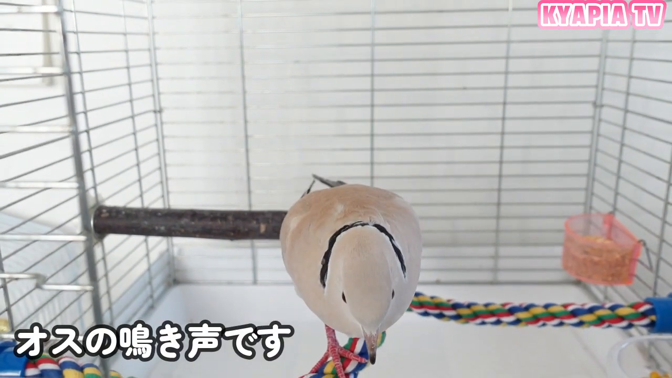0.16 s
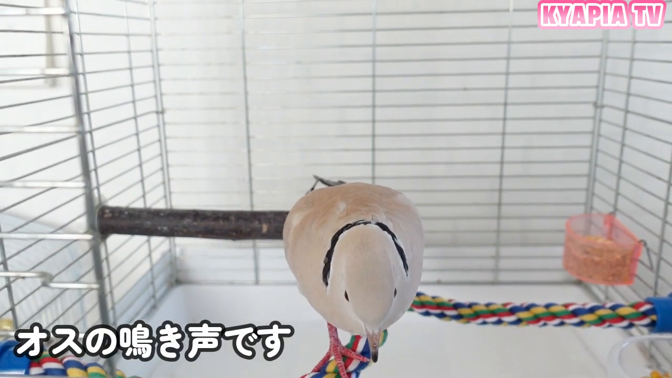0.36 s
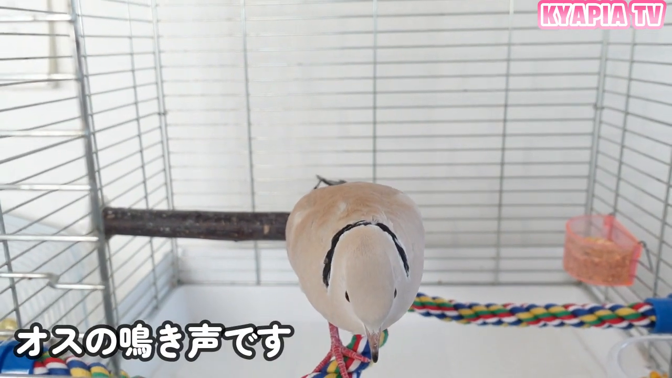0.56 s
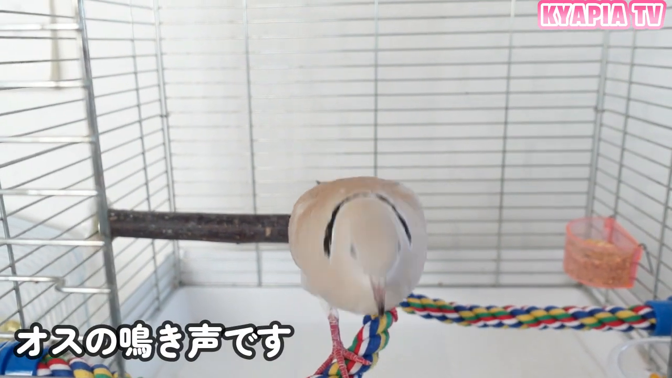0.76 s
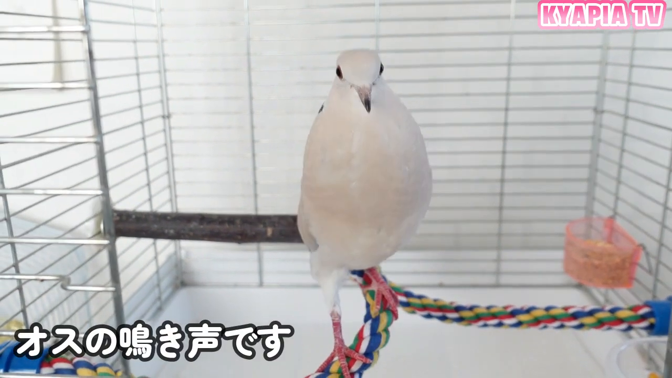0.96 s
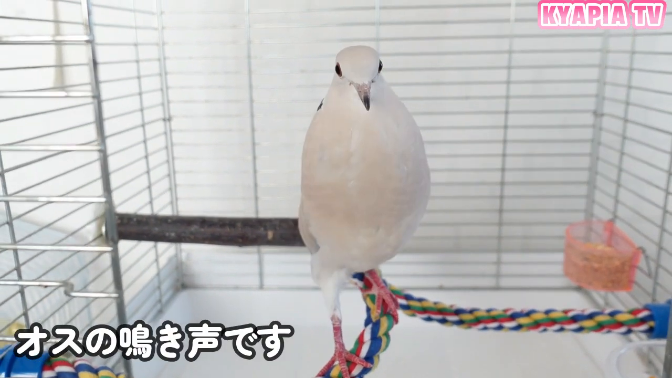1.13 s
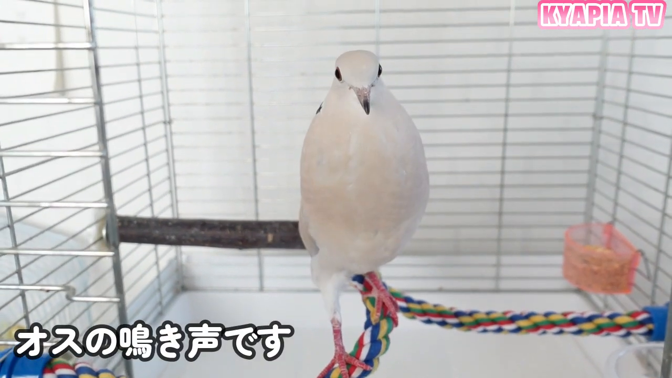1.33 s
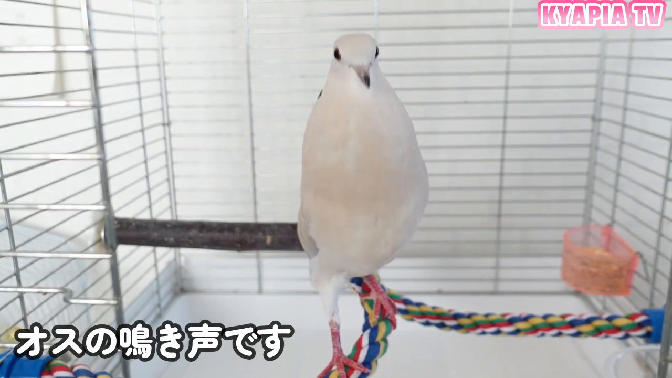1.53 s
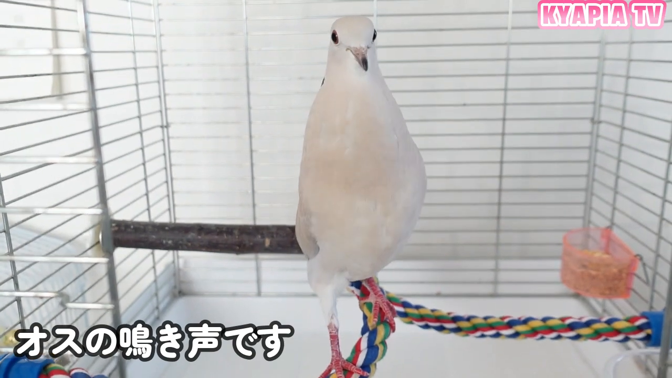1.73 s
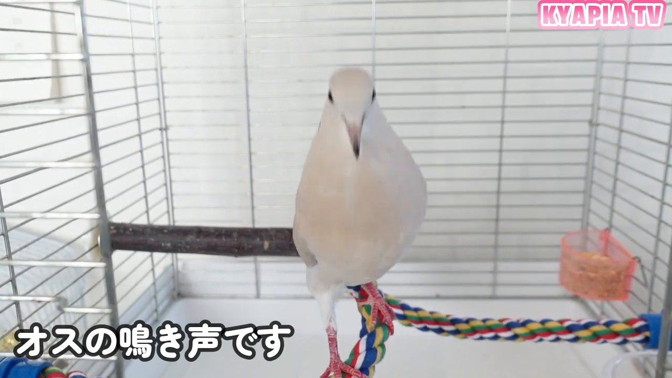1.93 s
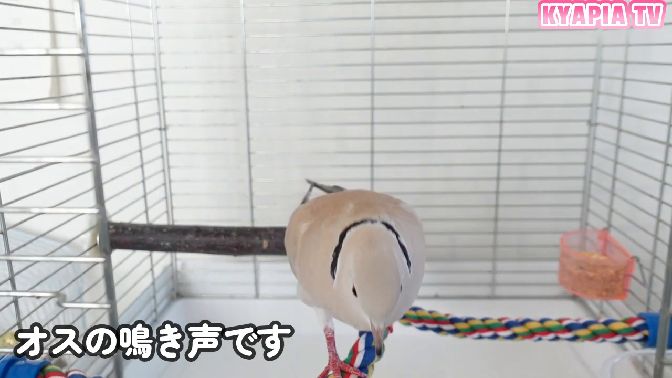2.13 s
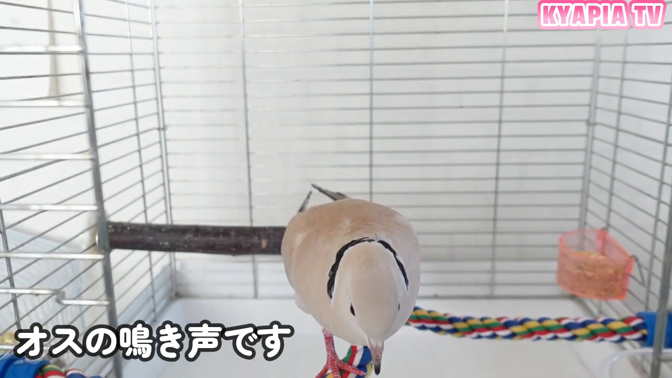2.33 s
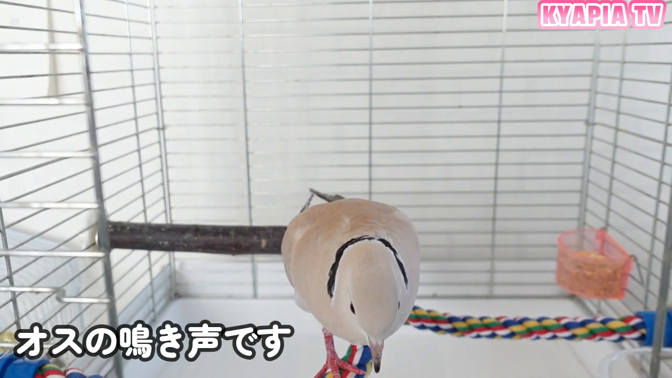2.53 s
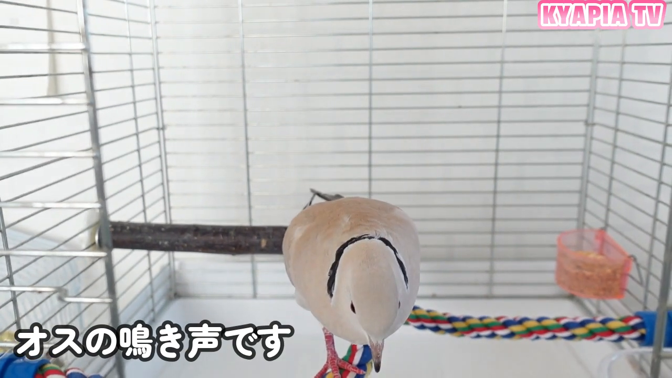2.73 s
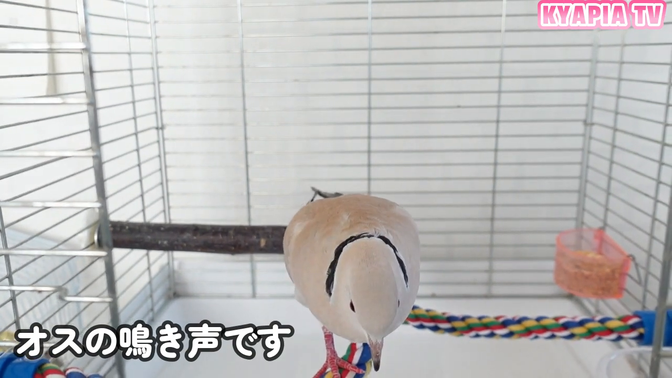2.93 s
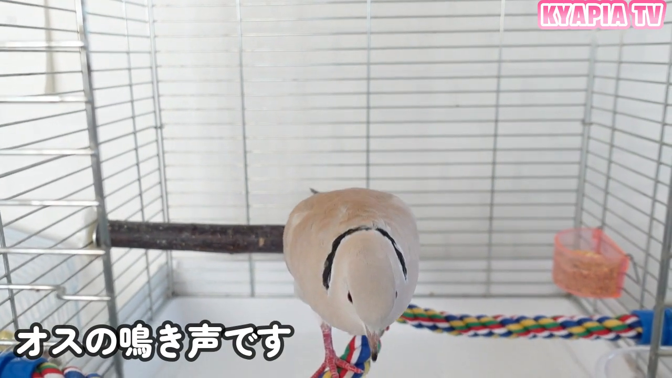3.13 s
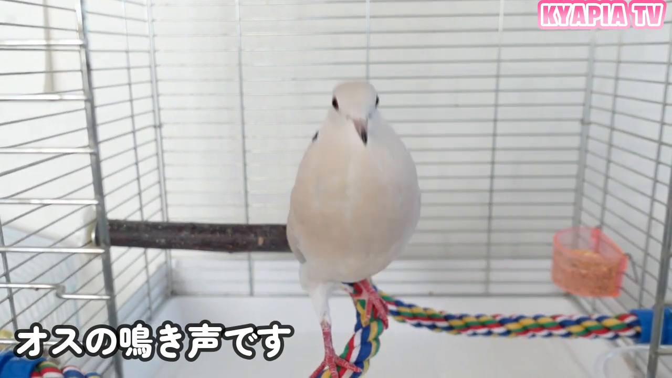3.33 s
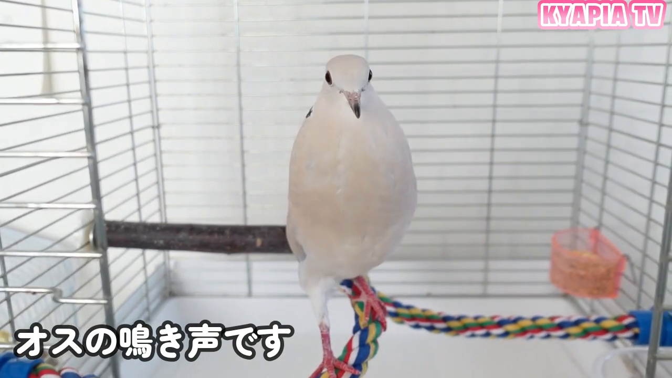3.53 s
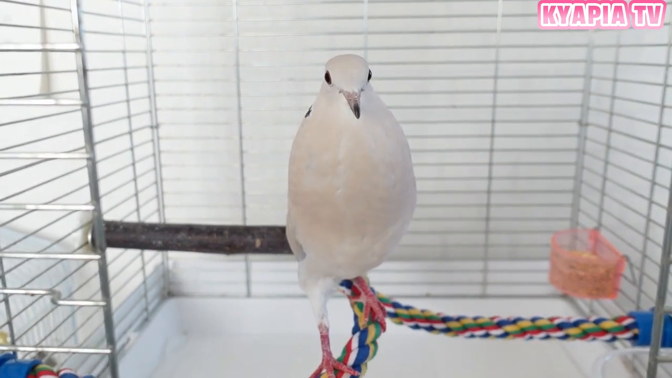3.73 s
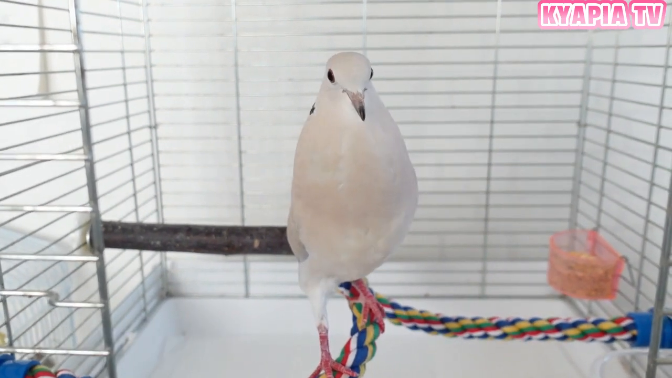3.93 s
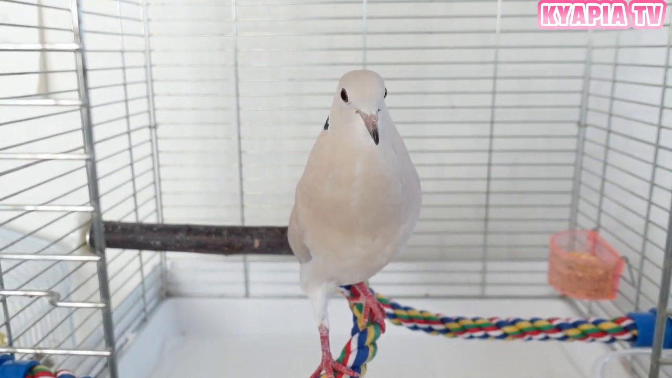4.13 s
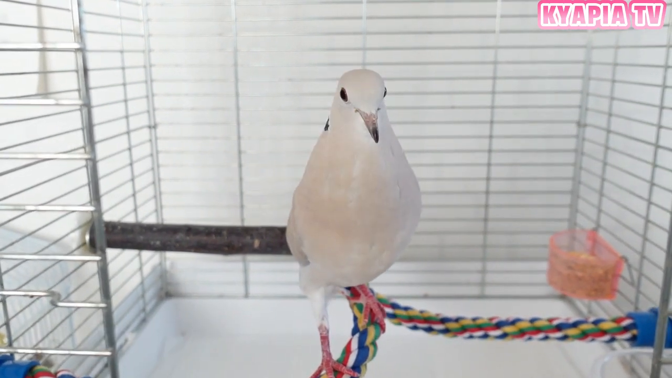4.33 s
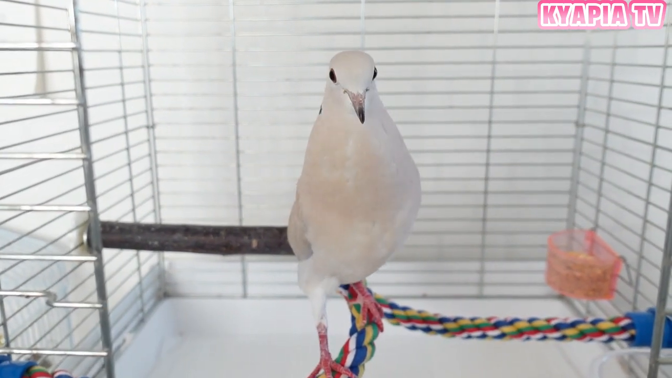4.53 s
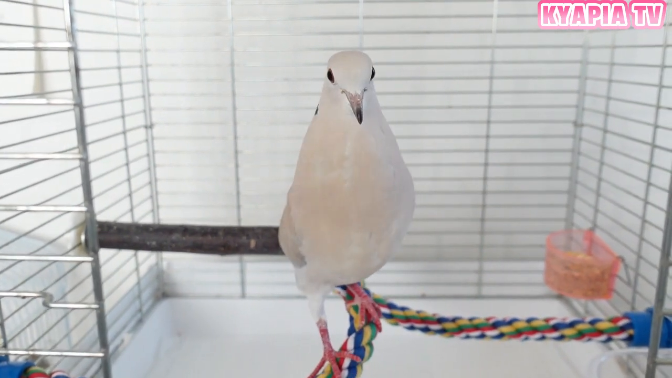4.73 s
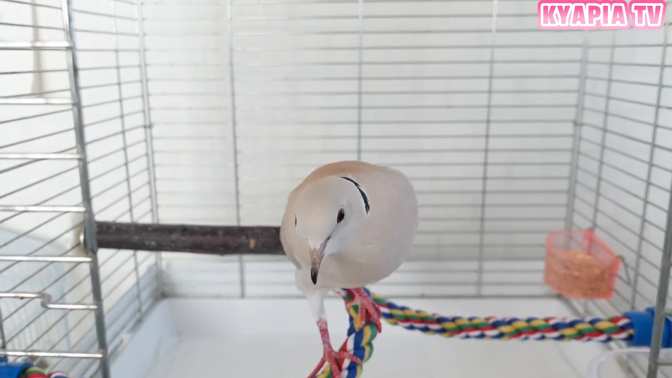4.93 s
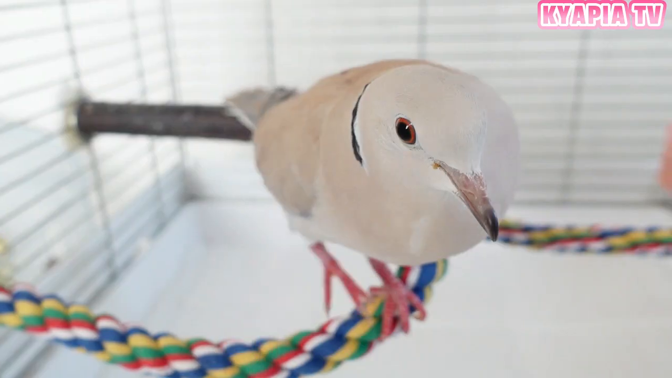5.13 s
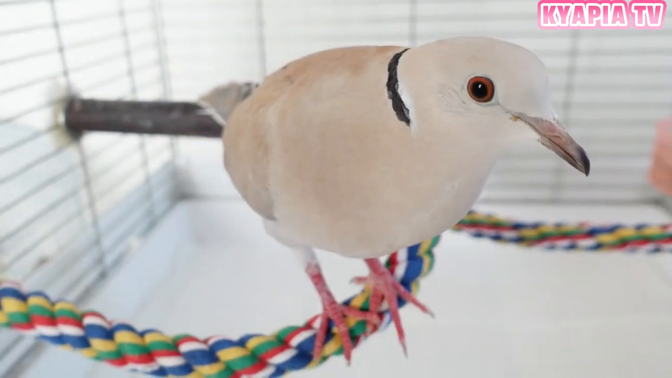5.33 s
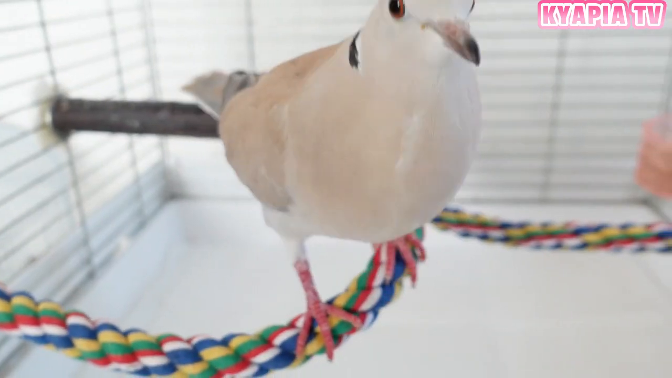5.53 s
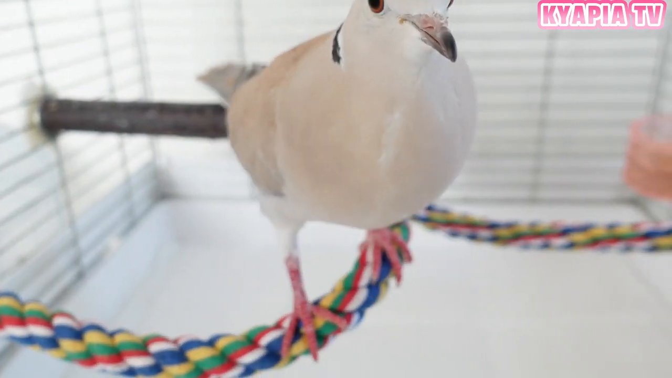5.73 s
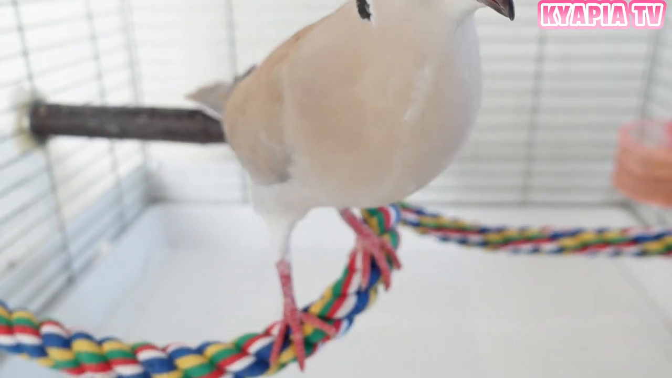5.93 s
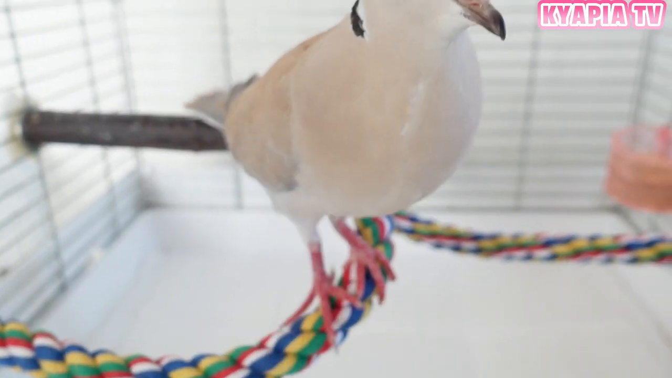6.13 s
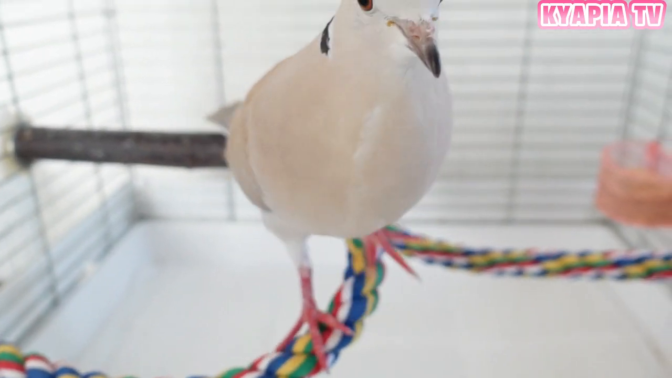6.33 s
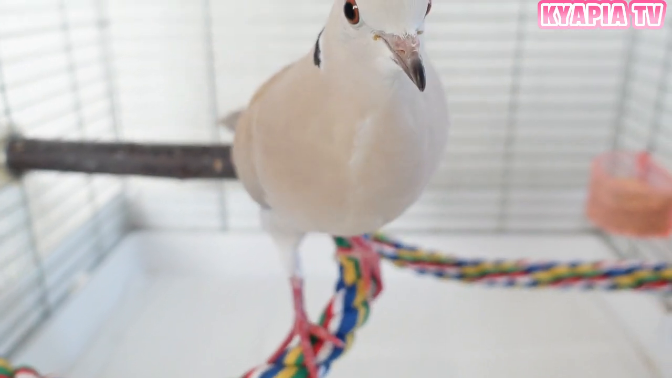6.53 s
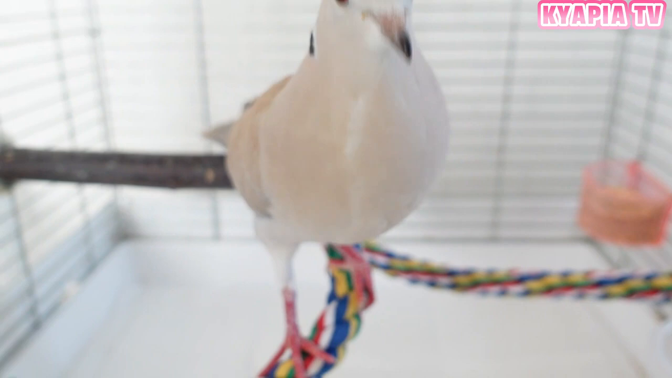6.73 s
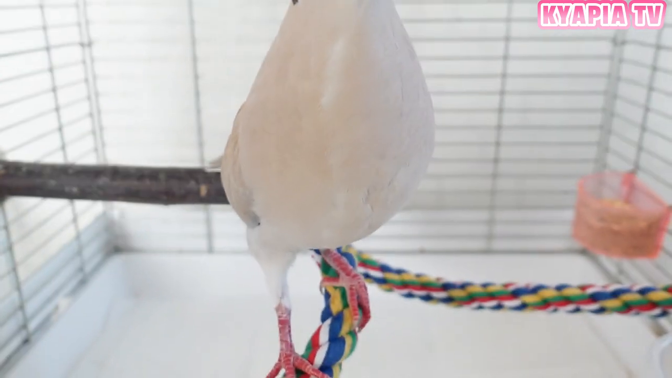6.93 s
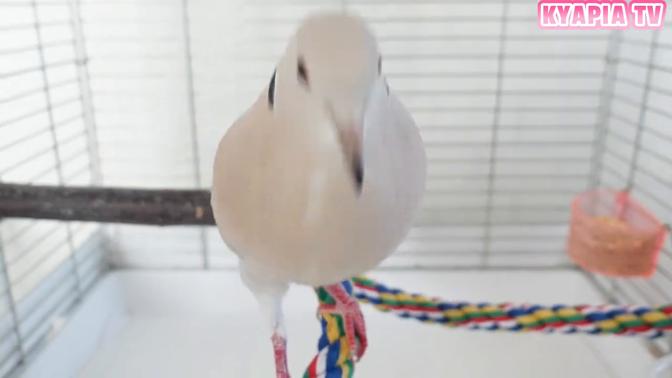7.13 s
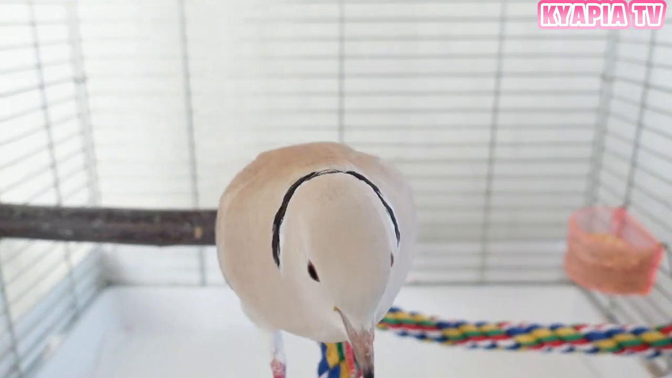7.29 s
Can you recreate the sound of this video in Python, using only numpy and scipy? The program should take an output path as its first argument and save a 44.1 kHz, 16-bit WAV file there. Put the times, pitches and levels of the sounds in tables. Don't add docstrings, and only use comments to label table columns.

```python
import sys
import numpy as np
from scipy import signal
from scipy.io import wavfile
from scipy.ndimage import uniform_filter1d

SR = 44100
rng = np.random.default_rng(int(sys.argv[2]) if len(sys.argv) > 2 else 0)


def to_wav(sig):
    pcm = np.clip(np.atleast_2d(sig), -1, 1) * 32767
    pcm = np.round(pcm).astype(np.int16)
    wavfile.write(sys.argv[1], SR, pcm.T)


def level_to_linear(level):
    exponent = np.asarray(level, float) / 20
    return 10 ** exponent


N = 324576

# (frequency [Hz], left-right likeness [0-1])
LIKENESS = [(60, 0.94), (240, 0.99), (950, 0.95), (3770, 0.58), (15000, 0.69)]


def evened(x):
    return x / np.sqrt(np.mean(x ** 2) + 1e-20)


def read(points, hz):
    f, value = np.transpose(points)
    return np.interp(np.log(hz + 1), np.log(f + 1), value)


def unroll(rows):
    s, *columns = np.transpose(rows)
    t = np.arange(s[0], s[-1], 1 / SR)
    return [t] + [np.interp(t, s, c) for c in columns]


def add(mix, s, sound):
    part = mix[..., round(s * SR):][..., :sound.shape[-1]]
    part += sound[..., :part.shape[-1]]


def filtered(x, order, hz, kind="low"):
    return signal.sosfilt(signal.butter(order, hz, kind, fs=SR, output="sos"), x)


def resonate(x, hz, width):
    turn = np.exp(2j * np.pi * np.cumsum(hz * np.ones(len(x))) / SR)
    r = np.exp(-np.pi * width / SR)
    return 2 * (turn * signal.lfilter([1 - r], [1, -r], x / turn + 1e-18)).real


def resonate_twice(x, hz, width):
    return resonate(resonate(x, hz, width), hz, width)


def wobble(size, span):
    once = uniform_filter1d(rng.standard_normal(size), int(span))
    return evened(uniform_filter1d(once, int(span)))


def swell(length, rise, fall):
    t = np.arange(round(length * SR)) / SR
    return np.sin(np.pi / 2 * np.clip(np.minimum(t / rise, (length - t) / fall), 0, 1)) ** 2


def bump(t, s, before, after):
    return np.cos(np.pi / 2 * np.clip((t - s) / np.where(t < s, before, after), -1, 1)) ** 2


def widened(left, other, hz):
    same = np.clip(read(LIKENESS, hz), -1, 1)[:, None]
    return np.array([left, same * left + np.sqrt(1 - same ** 2) * other])


def noise(spectrum, patchy_db):
    frames, hz = N // 256 + 5, np.fft.rfftfreq(1024, 1 / SR)
    a, b, c, d, patches = rng.standard_normal((frames, 513, 5)).T
    patches = evened(uniform_filter1d(uniform_filter1d(patches, 12, 0), 14, 1))
    z = widened(a + 1j * b, c + 1j * d, hz)
    z = z * level_to_linear(read(spectrum, hz)[:, None] + patchy_db * patches)
    x = signal.istft(z, nperseg=1024, noverlap=768)[1][:, :N]
    return x / np.std(filtered(x, 4, [8000, 14000], "band"))


def air():
    # (frequency [Hz], level [dB])
    colour = [(18, -85), (30, -58), (141, -10.5), (353, -8), (612, 2), (1150, -2), (1310, -2), (1490, -2.5),
              (3280, -2.5), (15800, -13.5)]
    # (time [s], hiss level [dB], extra gain of the low hum [dB])
    ride = [(0, -56, 6), (4.4, -56, 3), (5.0, -58, -2), (5.149, -59, -3), (5.5, -64, 2), (5.9, -62, 3),
            (6.1, -55, 0), (7.36, -58, 2)]
    s, db, hum_db = np.transpose(ride)
    t, x = np.arange(N) / SR, noise(colour, patchy_db=2.5)
    hum = signal.sosfiltfilt(signal.butter(2, 900, fs=SR, output="sos"), x)
    return level_to_linear(np.interp(t, s, db)) * (x - hum + level_to_linear(np.interp(t, s, hum_db)) * hum)


def finch(s, length, hz, end_hz, db, beak_hz, end_beak_hz, rough):
    shape = swell(length, (0.022 + 0.41 * rough) * length, (0.17 + 0.42 * rough) * length)
    size = len(shape)
    u = np.linspace(0, 1, size)
    arch = 1.01 - 0.076 * np.exp(-u * length / 0.01303) - 0.0755 * u ** 3
    scatter = 1 + 0.249 * rough * rough * wobble(size, 30) + 0.004 * wobble(size, 500)
    turns = np.cumsum((hz + (end_hz - hz) * u) * arch * scatter) / SR

    k = np.arange(2, 26)[:, None]
    start_db, end_db, phase = rng.standard_normal((3,) + k.shape)
    weak_low = np.minimum(k * hz / 2400, 1) ** 1.12
    drift_db = 1.4 * (start_db + (end_db - start_db) * u)
    waxing_db = 2.5 * np.sin(k * 3 + 7 * phase + 60 * length * u)
    overtones = weak_low * level_to_linear(drift_db + waxing_db) * np.cos(2 * np.pi * (k * turns + phase))

    breath = rough * rng.standard_normal(size) * level_to_linear(4.5 * wobble(size, 140))
    breathier_ends = 1 + 1.5 * u * u + 1.5 * (1 - u) ** 6
    drive = (1 - rough) * evened(overtones.sum(0)) + breath * breathier_ends

    centre_hz = beak_hz + (end_beak_hz - beak_hz) * u
    beak = resonate(drive, centre_hz * 0.94, 1200 + 2000 * rough)
    beak = resonate(beak, centre_hz * 1.06, 1500 + 4400 * rough)
    beak = beak + 0.22 * resonate_twice(drive, 1.4 * centre_hz, 900)
    beak = filtered(beak, 4, 6600)
    hiss = level_to_linear(-20) * resonate(resonate(breath, 7300, 5500), 8000, 7000)
    return level_to_linear(db) * evened(hiss + beak) * shape


def hoarse_calls():
    # (start [s], length [s], level [dB], extra opening of the beak [dB])
    rasps = [(0, 0.013, -45, 0), (.612, 0.04, -47, 0), (1.004, 0.078, -45.5, 0), (1.163, 0.068, -33.5, -3),
             (1.302, 0.038, -39.5, 2), (1.504, .11, -40, 0), (1.632, 0.039, -47.5, 0),
             (1.779, 0.15, -47.5, 0), (2.178, .054, -50, 0), (2.347, 0.04, -51, 0),
             (2.873, 0.069, -40.5, 4), (3.606, .06, -37, 0), (4.452, 0.039, -47, 0),
             (4.695, 0.049, -38.5, 0), (4.891, 0.05, -53.5, 0), (5.129, 0.04, -44, 6),
             (5.165, .06, -38, 12), (5.296, 0.084, -37.5, -2), (5.385, .05, -38, 5), (5.488, 0.087, -42, 3),
             (5.557, 0.077, -30, 3), (5.738, .029, -36.5, 0), (5.857, 0.059, -31.5, 0),
             (5.941, 0.057, -30.5, 0), (6.06, .13, -27, 0), (6.436, 0.031, -29, 0), (6.604, .079, -26.5, 0),
             (6.711, 0.04, -29.5, 0), (6.845, 0.049, -26, 0), (7.152, 0.041, -31, 0),
             (7.258, .12, -26.5, 0)]
    quiet_db, quiet_beak_hz, beak_hz_per_db = -39, 2925, 106
    out = np.zeros((2, N))
    for (s, length, db, open_db), hz in zip(rasps, rng.uniform(520, 680, len(rasps))):
        beak_hz = quiet_beak_hz + beak_hz_per_db * (db + open_db - quiet_db)
        call = finch(s, length, hz, 0.93 * hz, db, 1.08 * beak_hz, 0.9 * beak_hz, rough=0.47)
        add(out, s, call * level_to_linear([[-1.2], [1.2]]))
    return out


def whistle(length, hz, end_hz, db, pan_db):
    shape = swell(length, 0.008, 0.004)
    size = len(shape)
    glide = np.linspace(0, 1, size) ** 1.7
    glide = glide + 0.05 * wobble(size, 90)
    turns = np.cumsum((hz + (end_hz - hz) * glide) * (1 + 0.02 * wobble(size, 40))) / SR
    third = level_to_linear(-4) * (hz < 5000) * np.sin(6 * np.pi * turns)
    overtones = level_to_linear(max(9 * db + 160, -31)) * (np.sin(4 * np.pi * turns) + third)
    tone = np.sin(2 * np.pi * turns) + overtones
    flutter = level_to_linear(2.2 * wobble(size, 30) + 2.5 * wobble(size, 150))
    return level_to_linear(db - 2) * shape * flutter * tone * level_to_linear([[pan_db / 2], [-pan_db / 2]])


def parakeet():
    # (start [s], length [s], first pitch [Hz], level [dB], left minus right [dB])
    ups = [(.784, .028, 4076, -27.5, -5), (.794, 0.019, 1760, -33.5, -4), (3.33, 0.015, 5400, -47.5, 1.5),
           (5.457, 0.033, 4270, -29.5, -6), (5.693, 0.04, 5450, -23.5, 2.5), (5.527, .06, 3300, -32, 0),
           (5.53, .03, 6700, -36, 0), (6.585, .02, 3300, -27, 0), (6.66, .03, 3350, -29, -3),
           (.893, .03, 2950, -33, -3), (.786, .025, 3450, -40, -3), (5.708, 0.052, 4283, -20, -3),
           (6.106, 0.04, 4160, -30, -2), (6.228, 0.039, 4120, -21.5, -7), (6.631, 0.015, 6100, -23, -2.5)]
    # (start [s], length [s], first pitch [Hz], level [dB], left minus right [dB])
    downs = [(.052, 0.042, 4205, -28, -4.5), (5.4, .03, 4900, -33, 0), (5.392, 0.026, 3385, -26, -1.5),
             (.064, .017, 1885, -32.5, -7), (1.441, .032, 5880, -51, -3), (2.173, 0.11, 6680, -58, 5),
             (3.549, .058, 4300, -39.5, 1), (3.907, 0.013, 5950, -34, -4), (3.916, 0.031, 4510, -39, 5),
             (5.362, 0.024, 5400, -27.5, 0), (5.532, 0.032, 6050, -28, -3), (5.28, .04, 4330, -28, -2),
             (5.312, .025, 4700, -34, 0), (6.1, .03, 6150, -30, 0), (6.05, .03, 5850, -33, 0),
             (5.86, .02, 6200, -32, 0), (.16, .03, 3150, -34, -3), (7.27, .06, 6000, -32, -2),
             (.91, .09, 7200, -56, 0), (5.559, .13, 1847, -42, -2.5), (5.61, 0.022, 4130, -23.5, 2),
             (6.055, 0.016, 3450, -25, -6), (6.571, 0.013, 6080, -21.5, -5), (6.8, 0.048, 4190, -25.5, -8),
             (6.799, 0.027, 6160, -28.5, -5), (7.035, 0.021, 4300, -22.5, -1),
             (7.213, 0.072, 4367, -25.5, -2), (7.296, 0.063, 3350, -30, -5)]
    # (start [s], length [s], first pitch [Hz], level [dB], left minus right [dB])
    sweeps = [
        (0.122, 0.048, 5950, -26.5, -3.5),
        (.853, 0.048, 5450, -24.5, -3),
        (5.715, 0.053, 5430, -26.5, -1),
        (6.344, 0.064, 5380, -21.5, -4),
        (6.89, .045, 5480, -21.5, -1.5),
        (7.124, 0.072, 5200, -29, -2),
    ]
    out = np.zeros((2, N))
    for rows, bend in (ups, 1.034), (downs, 0.97):
        for s, length, hz, db, pan_db in rows:
            add(out, s, whistle(length, hz, bend * hz, db, pan_db))
    for s, length, hz, db, pan_db in sweeps:
        add(out, s, whistle(length, hz, 2955, db, pan_db))
    return out


def coo(hz, db):
    # (multiple of the pitch, level [dB])
    shut_beak = [(2, -52.5), (3, -57)]
    turns = np.cumsum(hz) / SR + rng.random()
    leak = sum(level_to_linear(k_db + 0.16 * (db + 7)) * np.sin(2 * np.pi * k * turns) for k, k_db in shut_beak)
    return np.sqrt(2) * (level_to_linear(db) * np.sin(2 * np.pi * turns) + leak)


def trills():
    rolls = [
        [.15, .188, .229, .265, .299, .334, .365, .399, .433, .465, .5, .541, .582, .626, .674],
        [2.506, 2.548, 2.584, 2.628, 2.66, 2.691, 2.725, 2.758, 2.794, 2.83, 2.869, 2.915, 2.958, 3.011],
    ]
    # (age [s], pitch [Hz], peak level [dB])
    filling = [(0, 456, -33.5), (.08, 471, -25.5), (0.119, 533, -19), (.185, 568, -17.5), (.25, 568, -18.5),
               (.36, 599, -20.5), (.52, 604, -19)]
    longest, rise, fall = 0.06, 0.0056, 0.018
    hoarse_db, hoarse_s = 3, 0.1
    out = np.zeros(N)
    age, climb_hz, climb_db = np.transpose(filling)
    for onsets in rolls:
        for s, gap in zip(onsets, np.diff(onsets, append=9)):
            since = s - onsets[0]
            hz, db = np.interp(since, age, climb_hz), np.interp(since, age, climb_db)
            shape = swell(min(gap, longest), rise, fall)
            t = np.arange(len(shape)) / SR
            flutter_db = hoarse_db * np.exp(-(since / hoarse_s) ** 2) * wobble(len(t), 220)
            db = db + 3 * np.exp(-t / 0.012) + 0.7 * wobble(len(t), 300) + flutter_db
            pitch = hz * (1 + 0.06 * np.exp(-t / 0.0046) + 0.24 * t)
            add(out, s - 0.004, shape * coo(pitch, db - 4.2))
    return out


def nasal_calls():
    # (start [s], length [s], first pitch [Hz], last pitch [Hz], level [dB])
    beeps = [(0.215, .25, 662, 649.2, -33), (.449, 0.038, 641, 665, -42.5), (1.066, 0.086, 487, 483.4, -42),
             (1.871, 0.09, 570, 556, -42.5), (2.39, 0.069, 516, 526, -48), (2.732, .09, 655, 580, -34),
             (2.997, 0.046, 544, 550, -36.5), (3.12, 0.064, 543, 534.4, -37.5),
             (3.409, 0.097, 600.6, 554, -43), (3.856, 0.0626, 511, 512, -44),
             (4.267, .086, 514, 513, -45.5), (4.353, 0.11, 503.4, 483.4, -42.5),
             (4.615, 0.12, 582, 569, -43.5), (4.792, 0.086, 636, 632, -41.5), (5.172, .16, 554, 528, -31.5),
             (6.461, .15, 697, 728.5, -28.5)]
    # (first frequency [Hz], last frequency [Hz])
    beaks = [(4000, 4000), (3000, 2500), (3500, 2500), (3000, 2800), (2800, 2600), (4500, 3300),
             (3200, 3400), (3500, 3300), (3000, 2500), (3500, 3300), (3200, 3000), (3300, 3000),
             (2700, 2900), (2800, 2800), (4200, 3500), (4500, 4000)]
    out = np.zeros((2, N))
    for row, beak in zip(beeps, beaks):
        add(out, row[0], finch(*row, *beak, rough=0.15) * level_to_linear([[-0.7], [0.7]]))
    return out


def note(s, length, hz, end_hz, effort_db):
    # (time [s], lowest pitch [Hz], fall [s], recovery [s], swell [dB])
    gulps = [(.77, 577, 0.033, 0.034, -3.5), (0.851, 556, 0.043, 0.038, -2), (1.046, 585, 0.016, .004, -5),
             (1.116, 459.5, 0.056, 0.057, 2.5), (1.4, 395, .075, .01, 6), (2.13, 428, 0.0098, 0.037, -7),
             (3.11, 575, 0.026, 0.029, -0.5), (3.18, 568, .04, 0.029, 2.5),
             (3.309, 536.3, 0.064, 0.044, 1.5), (3.571, 583, 0.013, .012, -4.5),
             (3.655, 395, .075, 0.058, 1), (3.775, 436, 0.019, 0.014, 2.5)]
    # (pitch [Hz], gain [dB])
    crop_gain = [(400, -15), (460, -2.5), (530, 8.5), (570, 3.5), (600, 5.5), (625, -1.5), (650, 0),
                 (672, -4)]
    push_db, push_s = 8, 0.0051
    swell_lead, swell_s = 0.12, 0.0095
    t = s + np.arange(round(length * SR)) / SR
    pitch = np.linspace(hz, end_hz, len(t))
    db = effort_db + push_db * np.exp((s - t) / push_s)
    for low_s, low_hz, fall, recovery, swell_db in gulps:
        pitch = pitch + (low_hz - pitch) * bump(t, low_s, fall, recovery)
        db = db + swell_db * np.exp(-((t - low_s + swell_lead * fall) / swell_s) ** 2)
    db = uniform_filter1d(db + read(crop_gain, pitch), 200)
    closing = 0.006 * (650 / end_hz) ** 5
    return coo(pitch, db) * swell(length, 0.0046, closing)


def held_notes():
    # (start [s], length [s], first pitch [Hz], last pitch [Hz], effort [dB])
    holds = [
        (0.729, 0.075, 620, 627, -26.5),
        (0.807, 0.24, 632, 650, -25),
        (1.053, 0.32, 621, 556, -22),
        (2.126, .198, 697, 617, -26.5),
        (3.066, 0.06, 613, 660, -25),
        (3.138, 0.11, 626, 651, -26.5),
        (3.252, .405, 649, 588.2, -23.5),
        (3.656, 0.163, 504.3, 468, -26),
    ]
    out = np.zeros(N)
    for row in holds:
        add(out, row[0], note(*row))
    return out


def feathers():
    # (start [s], length [s], centre [Hz], width [Hz], level [dB])
    hisses = [(1.938, 0.092, 13000, 8600, -47.5), (1.95, 0.033, 930, 570, -39),
              (2.19, 0.021, 9000, 4000, -54), (2.393, 0.032, 9450, 3600, -54.5),
              (3.409, 0.034, 9500, 3500, -45), (3.53, 0.072, 13600, 2500, -50.5),
              (3.7, .024, 13000, 2700, -54), (4.16, 0.075, 1600, 1800, -36), (4.917, 0.026, 9800, 800, -56),
              (5.591, 0.065, 7400, 2300, -38), (1.06, .06, 9500, 4500, -49), (1.06, .05, 14000, 3000, -55),
              (5.128, .012, 5000, 5000, -45), (5.82, 0.0049, 1200, 3060, -35.5),
              (6.984, 0.18, 5730, 470, -35.5)]
    out = np.zeros((2, N))
    for s, length, hz, width, db in hisses:
        shape = swell(length, 0.15 * length, 0.5 * length)
        burst = evened(resonate_twice(rng.standard_normal(len(shape)), hz, width))
        add(out, s, level_to_linear(db) * shape * burst)
    return out


def creak(rate, upper_db):
    turns = np.cumsum(rate * (1 + 0.015 * wobble(len(rate), 200))) / SR
    snaps = np.diff(np.floor(turns), prepend=0) * level_to_linear(0.88 * rng.standard_normal(len(rate)))
    crop = resonate(resonate(snaps, 540, 430), 510, 480)
    pipe = level_to_linear(upper_db) * (resonate(snaps, 1150, 300) + 0.5 * resonate(snaps, 2050, 600))
    return evened(filtered(crop + pipe, 3, [260, 4500], "band"))


def indrawn_creaks():
    # (time [s], pulse rate [1/s], level [dB], windpipe level [dB])
    breaths = [
        [(1.38, 117, -33, -20), (1.42, 147, -69, -28), (1.6, 130, -46, -20)],
        [(3.83, 138, -53, -30), (3.87, 139, -40.5, -23), (3.95, 138, -57.5, -23), (4.06, 120, -71, -11)],
        [(7.155, 210, -40, 8), (7.18, 157, -27.5, 10), (7.24, 148, -25.5, 2.5), (7.3, 143, -38, 20.5),
         (7.36, 147, -34, 15)],
    ]
    out = np.zeros(N)
    for rows in breaths:
        t, rate, db, upper_db = unroll(rows)
        add(out, t[0], level_to_linear(db) * creak(rate, upper_db))
    return out


def wing():
    # (peak [s], rise [s], rustle level [dB], wire ring level [dB])
    strokes = [
        (4.093, .012, -29, -56),
        (4.112, 0.022, -33.5, -25),
        (4.181, .06, -27, -24),
        (4.225, 0.048, -48, -27.5),
        (4.315, .04, -38.5, -51),
        (4.42, 0.17, -64, -41),
        (4.58, 0.15, -64, -36.5),
        (4.65, .05, -53.5, -70),
        (4.77, 0.021, -64, -41),
    ]
    # (frequency [Hz], level [dB])
    scrape = [(180, -52), (300, -20.5), (756, -15.5), (1600, -21), (3000, -10.5), (9000, -13.5),
              (15500, -17.5)]
    # (frequency [Hz], width [Hz], level [dB])
    wire = [(969, 130, -8.5), (7200, 200, -15)]
    s, rise, rustle_db, ring_db = np.transpose(strokes)[..., None]
    t = np.arange(s.min() - rise[0, 0], s.max() + 0.15, 1 / SR)
    build, since = bump(t, s, rise, np.inf), np.maximum(t - s, 0)
    rustle = np.linalg.norm(build * level_to_linear(rustle_db - 192 * since), axis=0)
    ring = np.linalg.norm(build * level_to_linear(ring_db - 214 * since), axis=0)
    grain = level_to_linear(1.15 * wobble(len(t), 60))
    shake = rng.standard_normal(len(t))
    low, high = (level_to_linear(db) * evened(resonate_twice(shake, hz, width)) for hz, width, db in wire)
    feather_noise = noise(scrape, patchy_db=2.2)[:, :len(t)]
    out = np.zeros((2, N))
    add(out, t[0], rustle * grain * feather_noise + ring * low + rustle * high)
    return out


def laugh(hz, bright_db):
    # (frequency [Hz], level [dB])
    throat = [(950, -19), (1300, -12), (1600, -15), (2050, -4), (2600, -7), (3300, -6), (4000, -19),
              (6400, -25), (7500, -32), (10500, -33), (15500, -44)]
    turns = np.cumsum(hz * (1 + 0.008 * wobble(len(hz), 60))) / SR
    k = np.arange(2, int(15500 / hz.max()))[:, None]
    start_db, end_db = rng.standard_normal((2,) + k.shape) * np.minimum(1.16 * k, 2.6)
    drift_db = start_db + (end_db - start_db) * np.linspace(0, 1, len(hz))
    upper = level_to_linear(read(throat, k * hz) + bright_db + drift_db) * np.cos(2 * np.pi * k * turns + 0.43 * k * k)
    puffs = level_to_linear(2.5 * wobble(len(hz), 25))
    return np.sqrt(2) * (np.cos(2 * np.pi * turns) + puffs * upper.sum(0))


def syllable(length, top_hz, db):
    start_hz, climb_hz_per_s, sag = 435, 3600, 0.024
    soft_db, soft_s, kick_db, kick_s = -12, 0.016, 5, 0.0041
    t = np.arange(round(length * SR)) / SR
    scoop = np.maximum(1 - t * climb_hz_per_s / (top_hz - start_hz + 60), 0) ** 2
    hz = (top_hz - (top_hz - start_hz) * scoop) * (1 - sag * (t / length) ** 3)
    level_db = db + soft_db * np.exp(-t / soft_s) + kick_db * np.exp((t - length) / kick_s)
    return level_to_linear(level_db) * laugh(hz, -1.5) * swell(length, 0.0049, 0.0046)


def laughing_call():
    # (start [s], length [s], top pitch [Hz], level [dB])
    laughs = [
        (5.94, 0.044, 594, -28),
        (6.047, 0.12, 695.5, -23),
        (6.244, 0.13, 686, -22),
        (6.464, 0.13, 663, -22),
        (6.706, 0.1316, 605.4, -22.5),
        (6.954, 0.13, 525.7, -26),
    ]
    # (start [s], peak level [dB], first pitch [Hz])
    hiccups = [
        (6, -14.5, 596),
        (6.176, -18, 574),
        (6.385, -19, 570),
        (6.62, -16, 596),
        (6.858, -17.5, 561),
        (7.102, -22, 535),
    ]
    out = np.zeros(N)
    for s, *rest in laughs:
        add(out, s, syllable(*rest))
    for s, db, hz in hiccups:
        shape = swell(0.041, 0.00436, 0.053)
        falling_hz = hz * np.linspace(1.06, 0.64, len(shape))
        add(out, s - 0.003, level_to_linear(db - 4) * shape * laugh(falling_hz, -3))
    return out


def room(x, near_s):
    # (frequency [Hz], time to fall 60 dB [s])
    decay = [(300, 0.31), (1000, 0.39), (4000, 0.32), (10000, 0.17)]
    taps = np.zeros((2, SR // 2))
    at = np.arange(round(near_s * SR), SR // 2 - 20, 20)
    at = at + rng.integers(0, 20, (2, len(at)))
    np.put_along_axis(taps, at, rng.choice([-1., 1.], at.shape), 1)
    hz, t, z = signal.stft(taps, SR, nperseg=256)
    z = widened(z[0], z[1], hz) * level_to_linear(-60 * t / read(decay, hz)[:, None])
    tail = signal.istft(z, SR, nperseg=256)[1]
    return signal.fftconvolve(x, tail / np.linalg.norm(tail[0]), axes=1)[:, :N]


def scene():
    near = (trills() + held_notes() + indrawn_creaks() + laughing_call())[None]
    flock = hoarse_calls() + parakeet() + nasal_calls() + feathers()
    far = filtered(flock, 3, 900, "high")
    dove_mix = near + level_to_linear(-13) * room(near, near_s=0.0043)
    flock_mix = level_to_linear(3) * far + level_to_linear(2) * room(far, near_s=0.003)
    return dove_mix + flock_mix + wing() + air()


def low_pass(x):
    return signal.sosfilt(signal.butter(12, 16510, fs=SR, output="sos"), x)


def record(dry):
    thin = filtered(dry, 2, 150, "high")
    pressure = resonate(dry.mean(0), 580, 500) ** 2
    thin = thin + level_to_linear(-27) * resonate(resonate(pressure, 78, 40), 75, 70)
    thin = signal.oaconvolve(thin, signal.firwin(255, 15750, fs=SR)[None], "same")
    return low_pass(thin)


dry = scene()
out = record(dry)
to_wav(out)
```